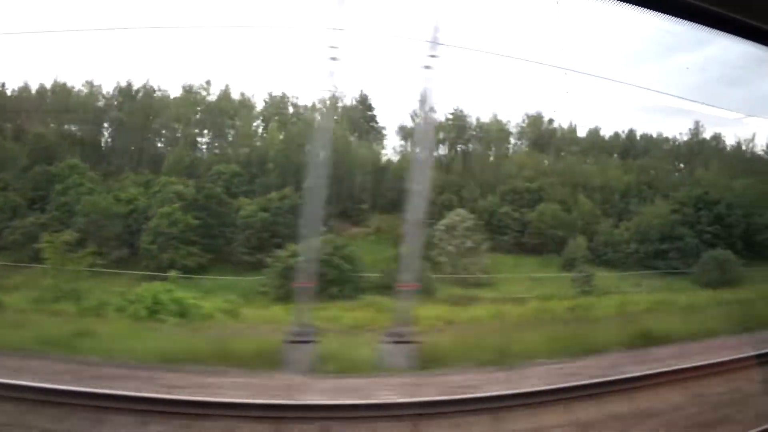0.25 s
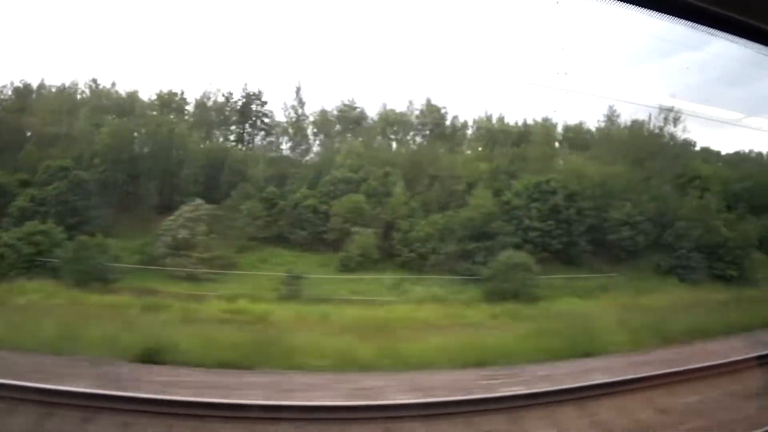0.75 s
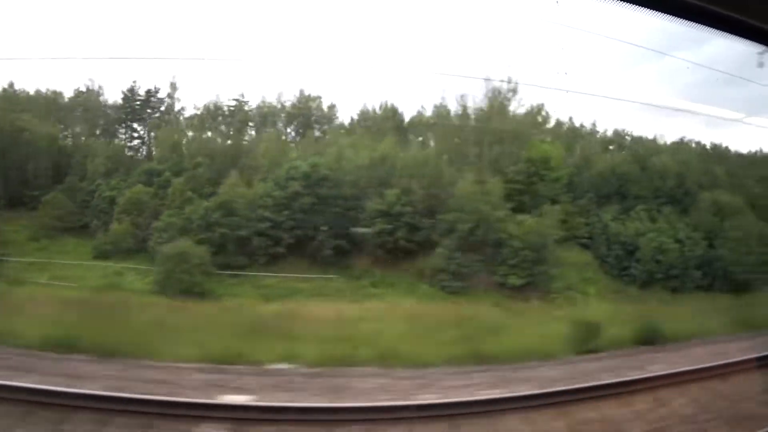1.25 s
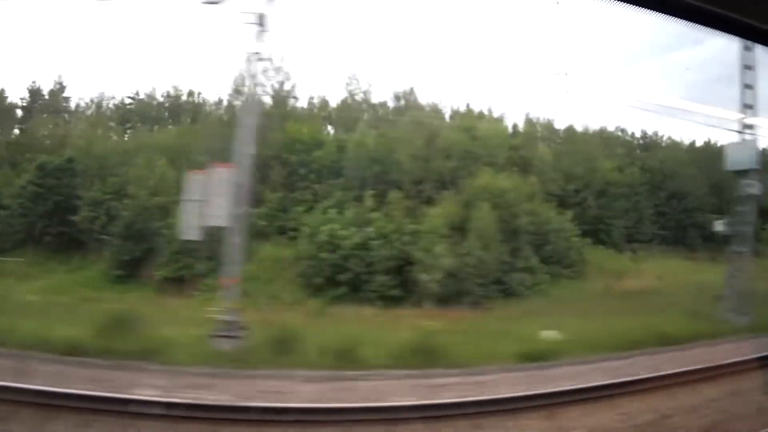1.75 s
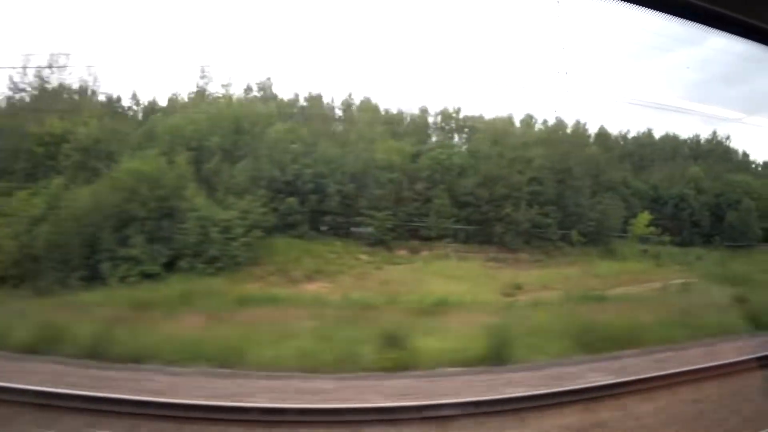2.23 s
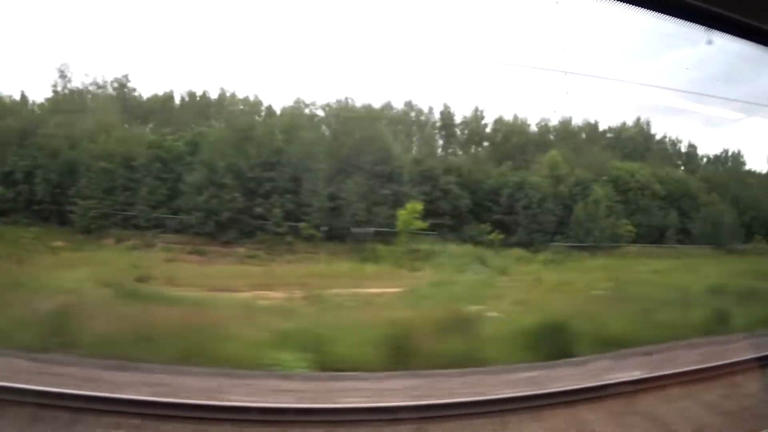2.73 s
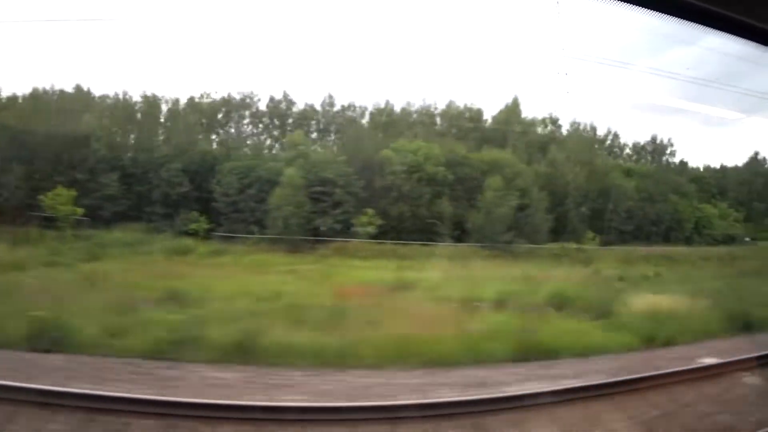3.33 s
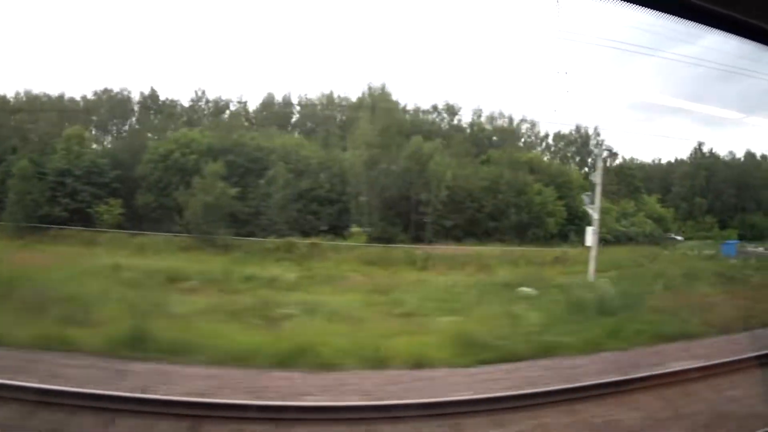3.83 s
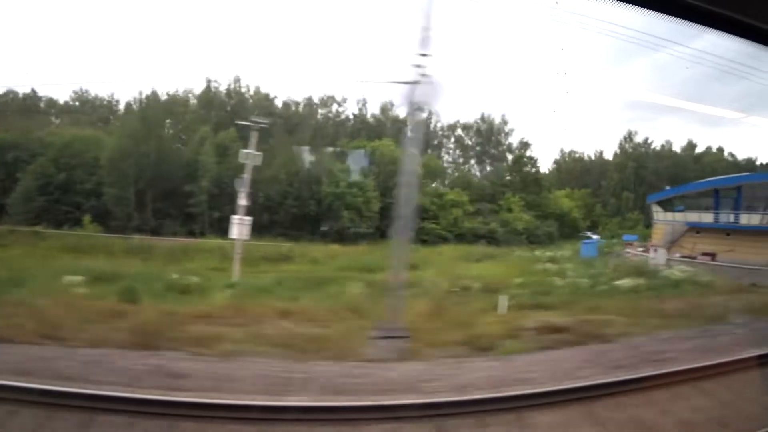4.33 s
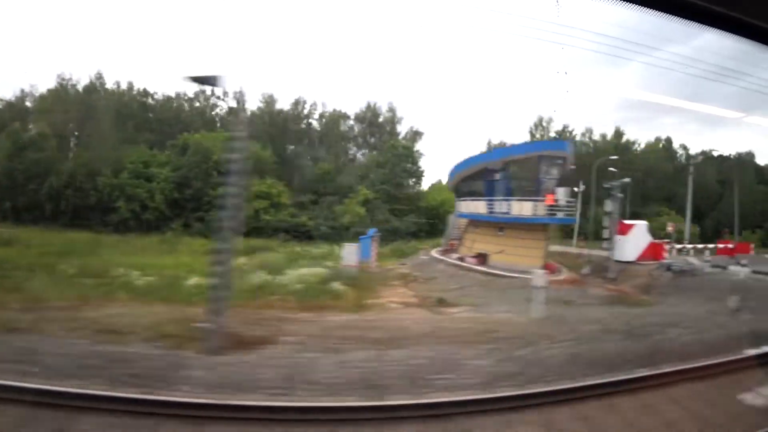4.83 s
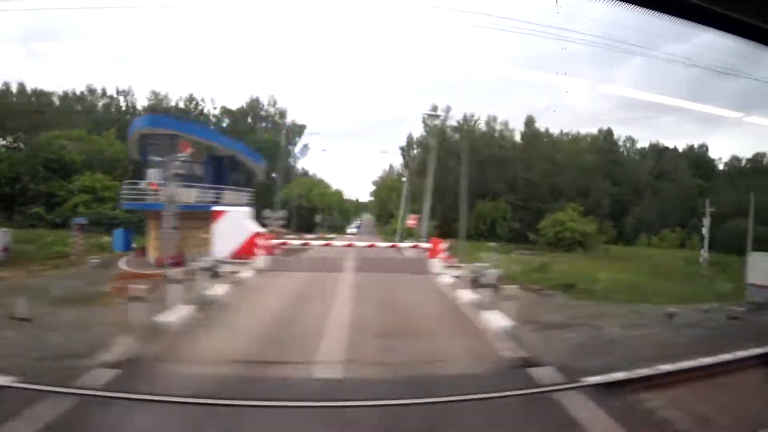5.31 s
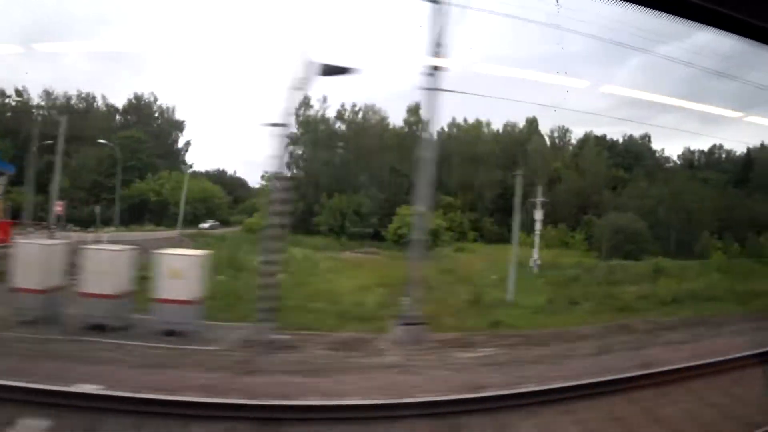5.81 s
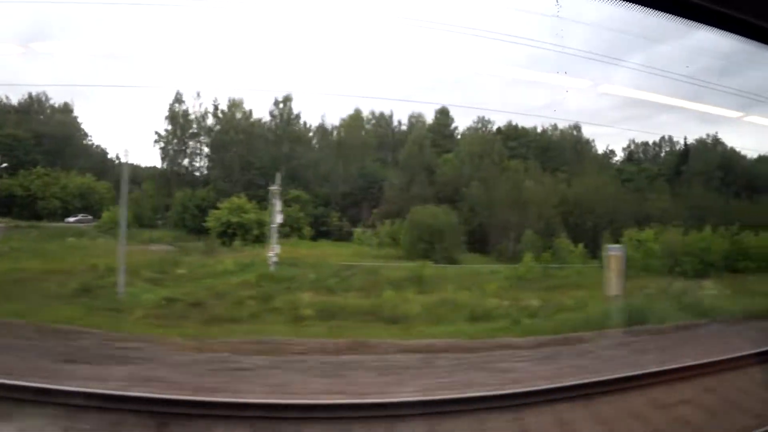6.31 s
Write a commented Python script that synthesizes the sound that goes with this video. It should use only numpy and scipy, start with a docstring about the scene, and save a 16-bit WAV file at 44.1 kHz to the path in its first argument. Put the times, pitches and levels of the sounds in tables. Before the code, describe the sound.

Inside a fast passenger train, wheels roar and knock over a deep rumble while thin plastic crinkles softly close by.

```python
"""Inside an electric passenger train at speed. The track shakes the car body into a rumble, the sleepers
beat out a boom, and the wheels roar in swells that grow on the rougher track near a level crossing.
Ventilation and electrical equipment hum steadily. Close by, something like a plastic bag rustles,
crinkles as its folds give way and scuffs against itself; loose fittings tick. The wheels knock on
flaws in the rail and squeal faintly near the end."""
import sys
import numpy as np
from scipy import signal
from scipy.fft import rfft, irfft, next_fast_len
from scipy.io import wavfile
from scipy.ndimage import uniform_filter1d, map_coordinates

SR = 44100
rng = np.random.default_rng(int(sys.argv[2]) if len(sys.argv) > 2 else 0)


def wav_record(signal):
    """Record a signal, one row per channel, as 16-bit PCM in the file named by sys.argv[1]."""
    frames = np.transpose(np.atleast_2d(signal))
    bounded = np.clip(frames, -1, 1)
    # unit amplitude maps onto the largest positive 16-bit level
    quanta = np.round(bounded * 32767).astype(np.int16)
    wavfile.write(sys.argv[1], SR, quanta)


N = 289283

# The stereo image. Each row: frequency in Hz, then the value noted alongside.
STEREO_LIKENESS = [(20, .99), (190, .98), (300, .87), (520, .83), (680, .6), (1400, .62), (2200, .45),
                   (4000, .6), (6700, .72), (8500, .56)]  # how alike left and right are, 0 to 1
STEREO_LEAD = [(15, .3), (60, .88), (100, 1.22), (170, 1.46), (350, 1.25), (1000, 1.2), (1400, .7),
               (1900, .1), (3500, 0)]  # lead of the left side in radians
STEREO_BALANCE = [(60, 3), (110, 1.5), (190, 0.9), (340, 0.5), (600, -0.5), (1060, -2), (1880, -1.5),
                  (3330, -1), (5910, -2), (10500, -1.5)]  # left minus right in dB

# Where each part rings. Each row: pitch in Hz, width in Hz, relative strength in dB.
BODY_MODES = [(14, 20.5, -5), (28, 5.6, -28), (37.7, 11, -4), (54.3, 4.5, -7)]
FLOOR_MODES = [(77, 26, -5), (101.4, 14, -2), (117.7, 8.9, 2), (138.3, 4.9, -4.5), (145, 20, -5),
               (168, 36, -6), (201.6, 52, -9)]
WHEEL_MODES = [(295, 20, -1), (344, 20, 3), (408, 22, -4), (460, 28, 0), (498, 28, -6), (555, 34, -6),
               (612, 44, -8), (760, 200, -16)]
RAIL_MODES = [(597, 260, 0), (818, 74, 4), (1020, 150, 0), (1380, 410, -6.5)]
PANEL_MODES = [(95.6, 17, 4), (122, 26, -20)]
HOWL_MODES = [(458, 28, 1), (593, 36, -0.52), (590, 21, -0.85), (705, 36, -1.7), (810, 37, 0.33),
              (900, 88, -1)]
PLASTIC_MODES = [(2050, 170, -.3), (2520, 220, 1.3), (3160, 180, 2.3), (3420, 220, -2.2), (5060, 340, -5.2),
                 (6720, 450, -8.3), (8300, 650, -11.5)]  # applied twice, for sharper peaks

# The broad colour of each layer. Each row: frequency in Hz, relative gain in dB.
BODY_EQ = [(5, -9), (14, 1), (62, 5), (85, -37), (150, -11), (400, -73)]
FLOOR_EQ = [(50, -40), (74, -1), (210, -1), (260, -4.5), (500, -11.5), (1500, -46)]
WHEEL_EQ = [(120, -22), (260, 6), (500, 1), (900, -8), (1500, -41), (2500, -4), (5000, -4.5), (11000, -47)]
RAIL_EQ = [(350, 8), (650, -0.5), (1600, -2), (3000, -4.5), (8000, -32)]
PANEL_EQ = [(55, -32), (90, 6.5), (130, -13), (220, -43)]
AIR_EQ = [(100, 8.5), (250, 5.5), (500, 8), (700, -2), (1000, 1), (1500, -0.5), (2100, -8), (3000, -12.5),
          (4000, -11.5), (5000, -19.5), (7000, -35.5), (8500, -29.5), (11000, -30.5)]
RUSTLE_EQ = [(800, 5), (2000, 6.5), (4000, 6), (5200, -0.5), (7000, 1), (8500, -12), (11000, -14)]
CRACKLE_EQ = [(600, -20), (1100, -2), (1700, 7), (2400, 10), (4200, 5.5), (6000, -3), (9000, -29)]
FIZZ_EQ = [(3000, -6.5), (5000, 4.5), (6900, 6.5), (8500, -8), (11000, -10)]
SIZZLE_EQ = [(5500, -22), (7600, 2.5), (8400, 1), (9200, -0.5), (10200, 2.5), (11000, -4), (12500, -40)]
HOWL_EQ = [(330, -28), (480, 0), (620, -0.5), (720, -2), (870, -10), (1100, -9), (2000, -56)]
THUD_EQ = [(180, -16), (350, 4.5), (600, 4), (900, -8.5), (1400, -14), (3000, -43.5)]
RASP_EQ = [(700, -12), (1500, 4), (3000, 2), (4000, 0), (5000, -3.5), (6000, -1.5), (7000, -4), (8000, -11),
           (9000, -18), (12000, -21)]

# Slow sway of the car body. Each row: time in seconds, rumble level in dB.
BODY_SWAY = [(0, -14.5), (.25, -24), (.5, -22.5), (1.65, -22), (2.55, -21), (2.75, -22), (3.2, -25.5),
             (3.45, -20.5), (3.7, -25), (4.08, -23.5), (4.3, -20.5), (4.85, -24), (5.1, -21), (6.56, -20.5)]
# The track, rougher towards the crossing. Each row: time in seconds, roughness in dB.
TRACK_ROUGHNESS = [(0, 1), (1.1, -1.5), (1.5, 1.5), (1.85, -1), (2.7, 1), (3.6, 1.5), (4.1, -1),
                   (4.48, 4.5), (4.6, 8), (5.45, 5.5), (5.58, 4.5), (5.75, 7), (6.56, 6)]
# How each part answers the track. Each pair: level on plain track in dB, dB gained per dB of roughness.
FLOOR_DRIVE = (-30.5, 0.84)
WHEEL_DRIVE = (-44.5, 1.86)
RAIL_DRIVE = (-46, 0.4)
# Worn rail. Each row: start and length in seconds, then wheel roar, wheel howl and rail ring in dB.
WORN_STRETCHES = [(0.481, 0.066, -36.5, -63, -54), (0.883, 0.08, -35, -45.5, -61),
                  (1.085, 0.026, -36.5, -48, -58), (1.303, .034, -39, -59, -65),
                  (1.47, 0.2, -37.5, -75, -67), (2.022, 0.16, -41, -58, -63),
                  (2.458, 0.26, -54, -47, -46.5), (3.738, 0.29, -39.5, -44.5, -52),
                  (4.083, 0.12, -40, -42, -46), (4.26, 0.087, -31, -41.5, -40.5),
                  (4.568, 0.18, -33, -38, -45.5), (4.892, 0.1, -33.5, -39, -45),
                  (5.21, 0.23, -29.5, -42, -44.5), (5.715, 0.16, -30, -37.5, -53),
                  (6.22, 0.069, -32, -41, -44)]
# The bed of the sleeper boom. Each row: time in seconds, fundamental in dB before trim, octave in dB.
BOOM_LEVELS = [(0, -22, -27.5), (.9, -36, -37.5), (1.15, -26.5, -26.5), (2, -28.5, -62), (3.2, -31, -54),
               (3.75, -34, -53), (4.3, -28.5, -38.5), (5, -29, -33), (5.5, -23.5, -35), (5.8, -25.5, -25),
               (6.1, -21, -23), (6.3, -27.5, -34.5), (6.56, -18.5, -55)]
# Bumps that swell the boom. Each row: time in seconds, peak in dB before trim.
BUMPS = [(1.04, -20.5), (1.68, -16.5), (1.96, -31), (3.17, -20), (4.3, -18), (4.85, -13.5), (5.34, -11),
         (5.6, -17), (5.95, -17.5), (6.13, -19.5), (6.35, -20)]
# The beat settles near the crossing. Each row: time in seconds, waver as a share of the beat's rate.
BEAT_WAVER = [(3.9, .07), (4.6, .008)]
# Fan and electrical tones. Each row: pitch in Hz, level in dB.
HUM_TONES = [(344, -53), (802, -59.5), (1099, -64.5), (2520, -73), (3151, -73), (5820, -84)]
# Handling of the bag. Each row: time in seconds, rustle in dB before trim, sizzle in dB.
BAG_HANDLING = [(0, -58, -76), (.6, -60, -76), (1, -61, -84), (1.9, -60.5, -78), (2.35, -58, -74.5),
                (2.48, -52.5, -67), (2.66, -53, -59), (2.8, -59.5, -73), (3.25, -61, -75), (3.47, -54, -82),
                (3.7, -55.5, -77), (3.88, -53, -63.5), (4.05, -56, -72), (4.33, -48.5, -63),
                (4.52, -57, -70), (4.72, -49, -63), (5, -54.5, -60.5), (5.1, -53.5, -75),
                (5.85, -57.5, -72), (6.5, -54.5, -69)]
# Folds giving way. Each row: start in seconds, crackle (before trim), fizz and sizzle in dB,
# 60 dB decay time in seconds.
CRINKLES = [(.194, -72, -58, -65, 0.23), (.464, -52, -61, -68, 0.37), (1.547, -54, -56.5, -66, 0.14),
            (1.68, -45, -61, -63, 0.23), (1.949, -52, -62, -67, 0.32), (2.029, -55, -63, -77, .2),
            (2.344, -40, -64, -67, 0.13), (2.409, -54, -60, -65, .16), (2.509, -38.5, -43.5, -54, 0.2),
            (2.793, -45, -63, -74, 0.23), (3.282, -56.5, -60, -65, 0.13), (3.384, -34.5, -44.5, -49, 0.25),
            (3.546, -42, -51, -56, 0.22), (3.771, -43.5, -65, -82, 0.41), (3.971, -50, -47.5, -58.5, 0.21),
            (4.109, -48, -66, -69, 0.22), (4.198, -48, -54, -61, 0.074), (4.242, -50, -60, -68, .23),
            (4.348, -47, -55, -61, 0.14), (4.37, -44, -46.5, -58, 0.16), (4.808, -45.5, -54, -82, 0.22),
            (4.854, -44, -48, -64, 0.25), (4.985, -54, -56, -68, .12), (5.088, -45, -58, -81, 0.21),
            (5.203, -64, -65, -58.5, 0.18), (5.438, -48, -52, -55, 0.092), (5.53, -46, -61, -82, 0.31),
            (6.423, -61, -59, -62, 0.1)]
# Loose fittings. Each row: start in seconds, level in dB, pitch in Hz, 60 dB decay time in seconds.
FITTING_TICKS = [(.183, -47, 6900, .09), (.528, -48, 3800, .045), (1.432, -51, 5330, .07),
                 (1.98, -51, 4200, .066), (4.747, -44.5, 4030, .09), (4.812, -49, 5650, .07),
                 (4.815, -46, 3020, .1), (4.986, -49.5, 3380, .15), (5.24, -41.5, 3740, .04),
                 (5.313, -48.5, 4600, .05), (5.757, -50, 4770, .035), (6.352, -40.5, 3870, .028)]
# Rail flaws. Each row: start in seconds, ring level in dB, pitch in Hz, 60 dB decay time in seconds.
WHEEL_KNOCKS = [(.639, -32, 573, .09), (.874, -29.5, 347, .14), (.915, -31, 450, .12),
                (.958, -31, 339, .12), (1.534, -24.5, 334, .11), (2.03, -39, 800, .16),
                (2.076, -29.5, 340, .22), (4.198, -32, 347, .08), (4.29, -27, 520, .16),
                (4.519, -25.5, 347, .17), (4.555, -33.5, 640, .12), (4.637, -23.5, 528, .1),
                (4.765, -26, 350, .12), (5.02, -26, 330, .1), (5.197, -26, 347, .12), (5.453, -28, 450, .1),
                (5.677, -28, 363, .1), (5.782, -22, 331, .1), (5.939, -22.5, 466, .16),
                (6.358, -16.5, 128, .18)]
# Plastic sliding on plastic. Each row: peak time in seconds, ring and rasp in dB,
# rise and 60 dB decay time in seconds, tilt of the ring in dB per octave.
SCUFFS = [(1.197, -52, -51, .003, .2, 6), (1.235, -42, -48.5, .02, .19, 5.5),
          (1.682, -32.5, -52, .01, .25, -3.5), (6.225, -46, -37.2, .003, .15, 4),
          (6.238, -46, -42.5, .003, .17, 4)]
# Faint wheel squeals. Each row: start and length in seconds, level in dB, pitch in Hz.
SQUEALS = [(5.36, .05, -66, 8500), (5.83, .03, -68, 8400), (6.31, 0.22, -66, 6900)]

SIDES = np.array([[.5], [-.5]])  # splits a difference between left and right
SLEEPER_HZ = 67.27  # sleepers passed in a second
BOOM_TRIM_DB, RUSTLE_TRIM_DB, CRACKLE_TRIM_DB = -1.5, 2.0, -6.0
PANEL_DB, AIR_DB = -32.5, -45.0
FLOOR_OVER_ROAR_DB = 4  # on worn rail
SNAP_DB, THUD_DB = -5.5, -8  # attack of a tick and of a knock, relative to its ring
TICK_WIDTH_HZ, TOP_HZ = 560, 11090


def amp(db):
    """Decibels to gain."""
    return 10 ** (np.asarray(db) / 20)


def unit(x):
    """Scale to rms 1."""
    return x / np.sqrt(np.mean(x ** 2) + 1e-20)


def along(points, hz):
    """Read (Hz, value) points on a log frequency axis."""
    f, v = np.transpose(points)
    return np.interp(np.log(hz + 1), np.log(f + 1), v)


def clock():
    """Time of each sample in seconds."""
    return np.arange(N) / SR


def curve(rows, column=1):
    """An automation lane: one column of timed rows, as a value per sample."""
    columns = np.transpose(rows)
    return np.interp(clock(), columns[0], columns[column])


def wobble(rate):
    """A smooth random curve, rate knots a second."""
    knots = rng.standard_normal(int(N * rate / SR) + 4)
    return map_coordinates(knots, [np.arange(N) * rate / SR])


def burst(s, rise, t60):
    """An envelope that swells up to time s and then dies away."""
    envelope = np.zeros(N)
    first, last = np.clip([int((s - 4 * rise) * SR), int((s + 2 * t60) * SR)], 0, N)
    t = np.arange(first, last) / SR - s
    envelope[first:last] = np.exp(-(np.minimum(t, 0) / rise) ** 2) * amp(-60 * np.maximum(t, 0) / t60)
    return envelope


def stretch(s, length, rise, fall):
    """An envelope that swells up to time s, holds and fades."""
    t = clock() - s
    return np.exp(-(np.minimum(t, 0) / rise) ** 2 - np.maximum(t - length, 0) / fall)


def filtered(x, response):
    """Filter x by a gain given as a function of frequency."""
    size = next_fast_len(N + SR // 2)
    return irfft(rfft(x, size) * response(np.fft.rfftfreq(size, 1 / SR)), size)[..., :N]


def resonances(modes, f):
    """Gain of a set of overlapping modes, summed in power."""
    gains = (amp(db) * f * width / (hz * hz - f * f + 1j * f * width) for hz, width, db in modes)
    return np.sqrt(sum(np.abs(gain) ** 2 for gain in gains))


def eq(points):
    """An EQ curve as a gain function of frequency."""
    return lambda hz: amp(along(points, hz))


def in_stereo(pair, colour):
    """Blend two unrelated signals into one coloured stereo sound whose mid has rms 1."""
    size = next_fast_len(N + SR // 2, real=True)
    hz = np.fft.rfftfreq(size, 1 / SR)
    spread = np.arccos(np.clip(along(STEREO_LIKENESS, hz), 0, 1)) / 2
    shared, apart = rfft(pair, size) * colour(hz) * np.array([np.cos(spread), np.sin(spread)])
    pan = amp(along(STEREO_BALANCE, hz) / 2) * np.exp(.5j * along(STEREO_LEAD, hz))
    ears = irfft(np.array([(shared + apart) * pan, (shared - apart) / pan]), size)[:, :N]
    return ears / np.std(ears.mean(axis=0))


def shaken(modes, points):
    """A structure shaken at random rings in its modes, under a broad EQ."""
    return in_stereo(rng.standard_normal((2, N)), lambda hz: resonances(modes, hz) * eq(points)(hz))


def steadied(x, span):
    """Even out the chance swells that last longer than span seconds."""
    power = np.mean(x, axis=0) ** 2
    for _ in range(2):
        power = uniform_filter1d(power, int(span * SR))
    return x / np.sqrt(np.abs(power) + 1e-6)


def tone(hz, blur, rate):
    """A stereo sine whose phase wanders by blur radians, rate times a second."""
    phase = 2 * np.pi * (hz * clock() + rng.random()) + blur * wobble(rate)
    pan = amp(SIDES * along(STEREO_BALANCE, hz))
    return np.sqrt(2) * pan * np.sin(phase + SIDES * along(STEREO_LEAD, hz))


def body_rumble():
    """The shaken car body rumbles in its lowest modes, rising and falling as it sways."""
    return amp(curve(BODY_SWAY)) * steadied(shaken(BODY_MODES, BODY_EQ), span=1.0)


def track_drive(plain_db, growth, worn):
    """How hard the track shakes a part: roughness and worn stretches add in power."""
    return np.hypot(amp(plain_db + growth * curve(TRACK_ROUGHNESS)), worn)


def rolling_roar():
    """The track drums the floor and makes wheels and rails roar; worn rail adds surges and a howl."""
    roar, howl, ring = sum(np.outer(amp(levels_db), stretch(s, length, rise=.021, fall=.056))
                           for s, length, *levels_db in WORN_STRETCHES)
    floor = steadied(shaken(FLOOR_MODES, FLOOR_EQ), span=.15)
    floor *= track_drive(*FLOOR_DRIVE, amp(FLOOR_OVER_ROAR_DB) * roar)
    wheels = amp(1.9 * wobble(30)) * steadied(shaken(WHEEL_MODES, WHEEL_EQ), span=.051)
    wheels *= track_drive(*WHEEL_DRIVE, roar)
    rails = amp(1.1 * wobble(23.885)) * shaken(RAIL_MODES, RAIL_EQ)
    rails *= track_drive(*RAIL_DRIVE, ring)
    howling = howl * steadied(shaken(HOWL_MODES, HOWL_EQ), span=.096)
    return floor + wheels + rails + howling


def panel_drone():
    """A wall panel drones evenly, whatever the track."""
    return amp(PANEL_DB) * steadied(shaken(PANEL_MODES, PANEL_EQ), span=.38)


def sleeper_boom():
    """The beat of the sleepers booms in the cabin together with its octave; bumps make it swell."""
    phase = 2 * np.pi * np.cumsum(SLEEPER_HZ * (1 + curve(BEAT_WAVER) * wobble(20))) / SR
    swells = sum(amp(db) * burst(s, rise=.055, t60=.38) for s, db in BUMPS)
    fundamental = amp(BOOM_TRIM_DB) * np.hypot(amp(curve(BOOM_LEVELS)), swells)
    octave = amp(curve(BOOM_LEVELS, column=2))
    sound = np.zeros((2, N))
    for order, level in enumerate([fundamental, octave], 1):
        hz = SLEEPER_HZ * order
        swing = np.sqrt(2) * level * amp(1.1 * wobble(11) + SIDES * along(STEREO_BALANCE, hz))
        sound += swing * np.sin(order * phase + .12 * wobble(25) + SIDES * along(STEREO_LEAD, hz))
    return sound


def ventilation():
    """A bed of moving air, with the slightly unsteady tones of fans and converters."""
    air = in_stereo(rng.standard_normal((2, N)), eq(AIR_EQ))
    hum = np.zeros((2, N))
    for hz, db in HUM_TONES:
        phase = 2 * np.pi * np.cumsum(hz * (1 + .00308 * wobble(30))) / SR
        drift_db = .7 * wobble(4.35) + 1.4 * np.array([wobble(2.57), wobble(2.5)])
        hum += np.sqrt(2) * amp(db + drift_db) * np.sin(phase + SIDES * along(STEREO_LEAD, hz))
    return amp(AIR_DB + 2.2 * wobble(5.2)) * air + hum


def crackling(rate, spread_db, t60, wet):
    """Tiny snaps of uneven size, rate a second, each followed by the cabin's short, diffuse answer."""
    sizes = amp(spread_db * np.minimum(rng.exponential(size=N), 4)) * rng.choice([-1, 1], N)
    snaps = sizes * (rng.random(N) < rate / SR)
    decay = amp(-60 * np.arange(SR // 8) / SR / t60)
    echo_power = np.abs(signal.fftconvolve(snaps ** 2, decay ** 2)[:N])
    answer = unit(np.sqrt(echo_power) * rng.standard_normal((2, N)))
    return np.array([unit(unit(snaps) + wet * answer[0]), answer[1]])


def flexing_plastic(points, rate, spread_db, t60=.08, wet=.8, patch_db=1.8):
    """A texture of snaps in which every flexing fold favours pitches of its own for a moment."""
    spectra = signal.stft(crackling(rate, spread_db, t60, wet), nperseg=256)[2]
    patches = uniform_filter1d(rng.standard_normal(spectra.shape[1:]), size=3, axis=0)  # across pitch
    patches = uniform_filter1d(patches, size=9, axis=1)  # across time
    snaps = signal.istft(spectra * amp(patch_db * unit(patches)), nperseg=256)[1][:, :N]
    return in_stereo(snaps, eq(points))


def bag():
    """Thin plastic rustles as it is moved; folds give way in short showers of snaps."""
    rustle = flexing_plastic(RUSTLE_EQ, rate=700, spread_db=3.3, t60=.14, wet=1.7)
    crackle = steadied(flexing_plastic(CRACKLE_EQ, rate=3000, spread_db=3.5), span=.012)
    fizz = steadied(flexing_plastic(FIZZ_EQ, rate=2000, spread_db=4), span=.012)
    sizzle = steadied(flexing_plastic(SIZZLE_EQ, rate=1500, spread_db=4), span=.02)
    sound = amp(curve(BAG_HANDLING) + RUSTLE_TRIM_DB + .28 * wobble(21.66)) * rustle
    sound += amp(curve(BAG_HANDLING, column=2)) * sizzle
    for s, crackle_db, fizz_db, sizzle_db, t60 in CRINKLES:
        shower = burst(s + .004, rise=.025 * t60, t60=t60)  # short showers start more abruptly
        attack = .7 * burst(s + .004, rise=.002, t60=.06)  # the first snaps are the hardest
        snaps = amp(crackle_db + CRACKLE_TRIM_DB) * crackle + amp(fizz_db) * fizz
        sound += (shower + attack) * (snaps + amp(sizzle_db) * sizzle)
    return sound


def fitting_ticks():
    """Each loose fitting taps once, with a tiny snap, and rings very briefly around its own pitch."""
    sound = np.zeros(N)
    size = SR // 7
    f = np.fft.rfftfreq(size, 1 / SR)
    bright = unit(filtered(rng.standard_normal(N), lambda hz: resonances([(5000, 3500, 0)], hz) ** 2))
    for s, db, hz, t60 in FITTING_TICKS:
        band = resonances([(hz, TICK_WIDTH_HZ, 0)], f) ** 2
        narrow = irfft(rfft(rng.standard_normal(size)) * band, size)
        ring = np.resize(unit(np.cos(np.angle(signal.hilbert(narrow)))), N)  # phase only: an even level
        snap = amp(SNAP_DB) * burst(s, rise=.0005, t60=.015) * bright
        sound += amp(db) * (burst(s, rise=.0008, t60=t60) * ring + snap)
    return sound


def wheel_knocks():
    """Each flaw in the rail strikes a wheel with a dull thud; one resonance of the car answers."""
    thud = steadied(in_stereo(rng.standard_normal((2, N)), eq(THUD_EQ)), span=.01)
    sound = np.zeros((2, N))
    for s, db, hz, t60 in WHEEL_KNOCKS:
        blow = amp(THUD_DB) * burst(s, rise=.001, t60=.045) * min(hz / 350, 1)  # softer on deep knocks
        ring = burst(s, rise=.84 / hz, t60=t60) * tone(hz, blur=.78, rate=hz / 4)
        sound += amp(db) * (blow * thud + ring)
    return sound


def bag_scuffs():
    """Brief, catching slides rasp broadly and excite the resonances of stiffer plastic."""
    rasp_catches, ring_catches = (crackling(rate=1400, spread_db=2, t60=.077, wet=.7) for _ in range(2))
    rasp = steadied(in_stereo(rasp_catches, eq(RASP_EQ)), span=.008)
    sound = np.zeros((2, N))
    for s, ring_db, rasp_db, rise, t60, tilt_db in SCUFFS:
        colour = lambda hz: resonances(PLASTIC_MODES, hz) ** 2 * amp(tilt_db * np.log2((hz + 1) / 3000))
        ring = steadied(in_stereo(ring_catches, colour), span=.012)
        sound += burst(s, rise, t60) * (amp(ring_db) * ring + amp(rasp_db) * rasp)
    return sound


def wheel_squeals():
    """Thin, rough whistles, perhaps from the wheel flanges."""
    return sum(amp(db) * stretch(s, length, rise=.01, fall=.012) * tone(hz, blur=1.5, rate=800)
               for s, length, db, hz in SQUEALS)


def scene():
    """The mix at a window seat: the train's bed, with the details on top."""
    bed = body_rumble() + rolling_roar() + panel_drone() + sleeper_boom() + ventilation()
    return bed + bag() + fitting_ticks() + wheel_knocks() + bag_scuffs() + wheel_squeals()


def record(dry):
    """A brick-wall low-pass takes off the highest treble."""
    return filtered(dry, lambda hz: hz < TOP_HZ)


dry = scene()
out = record(dry)
wav_record(out)
```